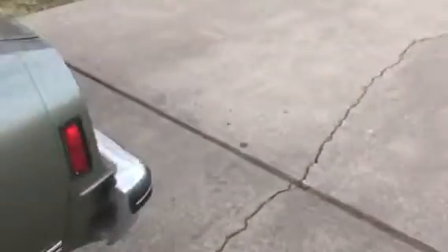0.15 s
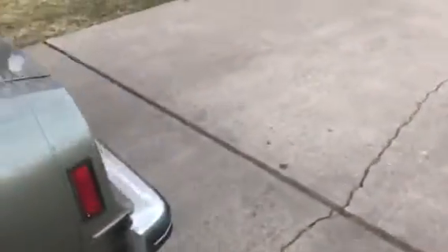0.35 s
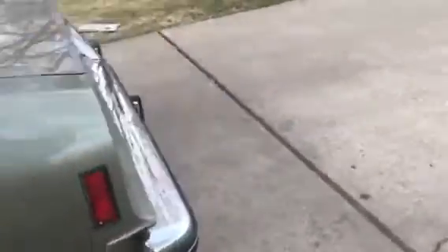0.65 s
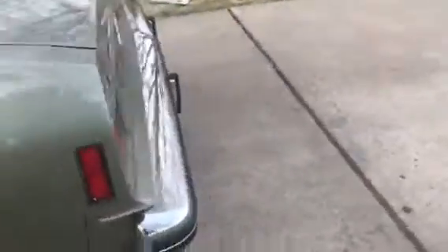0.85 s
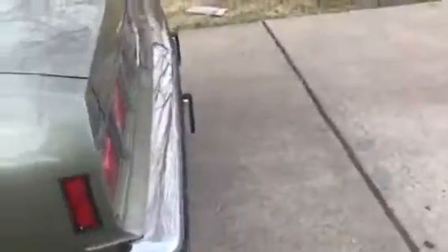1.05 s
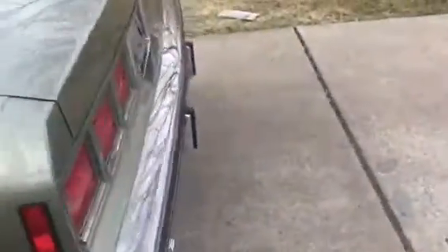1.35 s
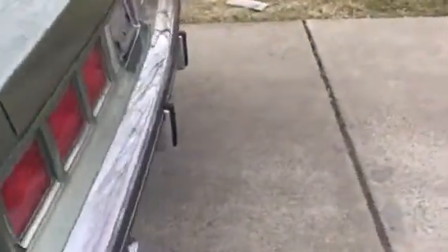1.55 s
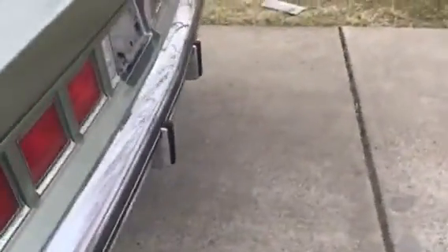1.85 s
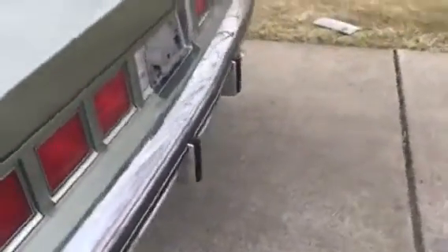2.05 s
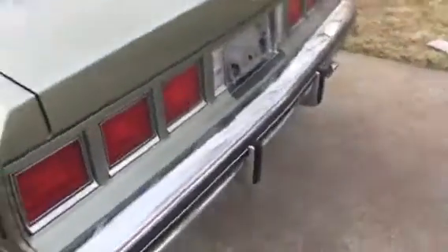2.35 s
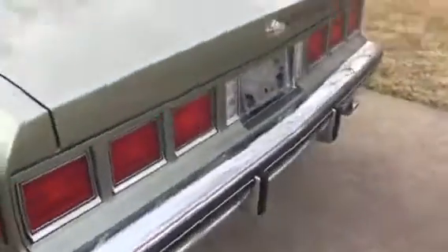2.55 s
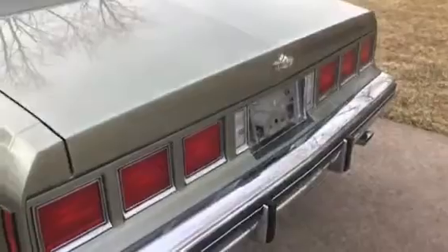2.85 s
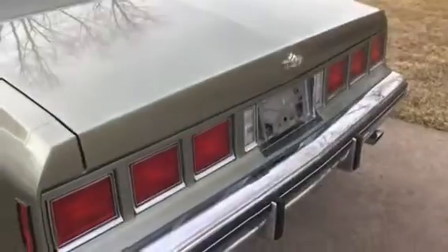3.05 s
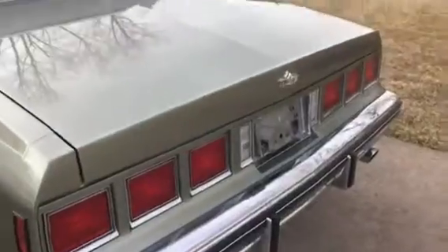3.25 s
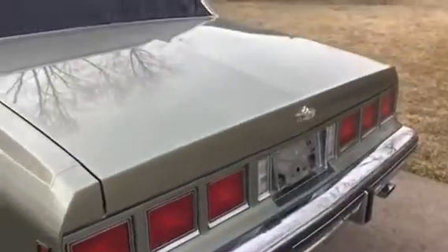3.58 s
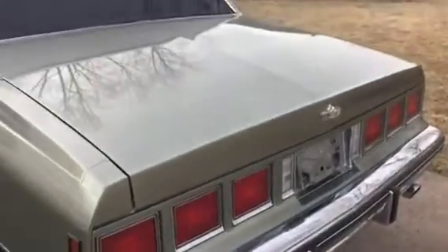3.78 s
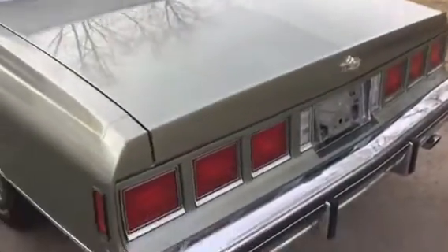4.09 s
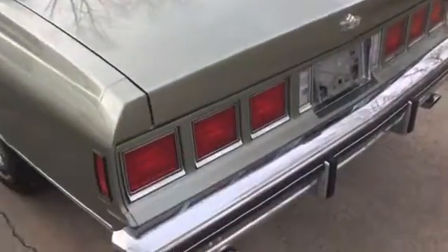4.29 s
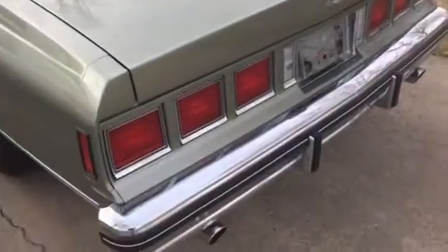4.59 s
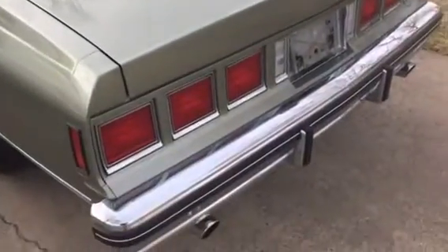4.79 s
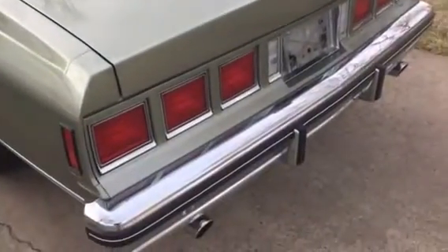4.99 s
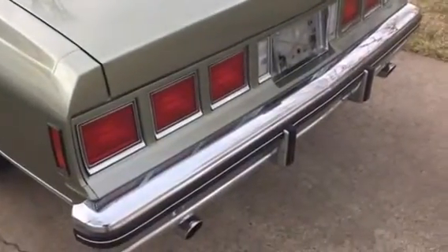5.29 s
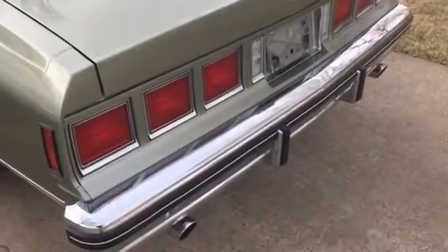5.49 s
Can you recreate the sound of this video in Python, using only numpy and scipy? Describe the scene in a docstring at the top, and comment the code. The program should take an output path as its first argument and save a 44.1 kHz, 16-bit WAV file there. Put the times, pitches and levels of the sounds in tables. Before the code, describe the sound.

A big eight-cylinder petrol car idles outdoors, heard close by on a handheld mono microphone moving from its side to its rear. From 0 to about 2 s the idle is fairly fast, around 53 firings a second: a loud deep boom with a fuller burble, a hollow silencer hum and soft raspy chuffs. The bass swells as the near pipe is passed around 1.8 s. A short gritty hand scuff comes at 1.9 s. Between 1.9 and 2.4 s the revs sink to about 45 firings a second, and a low drone swells as they settle. A second, crackly brush falls at 2.6-2.7 s, with a very faint thin whine at 2.7-3.3 s. Until 5.6 s the slow idle continues evenly, darker and loping, with quiet pipe puffs, fine hiss, thin metallic ringing and faint high squeaky ticks, some chirping out. It does not rev or stop.

```python
"""Idling V8 with twin exhaust pipes

A big petrol V8 on a driveway drops from a fast idle to a slow one after two seconds.
One train of eight uneven pulses a cycle excites pipe, silencer and tailpipe resonances: boom, burble and rasp.
Shaped noise hisses at the pipe mouths; metal rings, squeaks and whines faintly in decaying tones.
A hand brushes the microphone twice, as gritty noise, while it is carried round the bumper."""
import sys
import numpy as np
from scipy import signal
from scipy.fft import rfft, irfft
from scipy.io import wavfile
from scipy.ndimage import uniform_filter1d

SR = 44100
rng = np.random.default_rng(int(sys.argv[2]) if len(sys.argv) > 2 else 0)


def wav_record(signal):
    """Record a signal, one row per channel, as 16-bit PCM in the file named by sys.argv[1]."""
    frames = np.transpose(np.atleast_2d(signal))
    bounded = np.clip(frames, -1, 1)
    # unit amplitude maps onto the largest positive 16-bit level
    quanta = np.round(bounded * 32767).astype(np.int16)
    wavfile.write(sys.argv[1], SR, quanta)


N = 248283
TIME = np.arange(N) / SR
BAND_LIMIT_HZ = 15800
WALK_S = 0.63, 3.15  # the microphone passes from beside the car to behind it between these times


def gain_of(db):
    """Decibel law: amplitude grows tenfold every 20 dB."""
    return 10 ** (np.asarray(db) / 20)


def evened(x):
    """Power normalisation: scales to an rms of one."""
    return x / np.sqrt(np.mean(x ** 2) + 1e-20)


def read_table(table, s):
    """Linear interpolation of a two-column timed table at the times s."""
    return np.interp(s, *np.transpose(table))


def at_level(x, db):
    """Slow gain control: the smoothed power follows db while the beat of the cylinders remains."""
    size = SR // 3
    power = uniform_filter1d(uniform_filter1d(x ** 2, size), size // 2)
    return gain_of(db) * x / np.sqrt(abs(power) + 1e-20)


def add(mix, s, sound):
    """Superposition: adds a sound into mix from time s."""
    start = round(s * SR)
    sound = sound[max(-start, 0):]
    part = mix[max(start, 0):][:len(sound)]
    part += sound[:len(part)]


def band(x, low_hz, high_hz, order=2):
    """Band-pass filtering: keeps the energy between two frequencies."""
    edges = [low_hz, min(high_hz, SR / 2 - 100)]
    return signal.sosfilt(signal.butter(order, edges, "band", fs=SR, output="sos"), x)


def coloured(x, spectrum):
    """Spectral shaping: weights each frequency by a table of frequency_hz, gain_db."""
    hz, db = np.transpose(spectrum)
    bins_hz = np.fft.rfftfreq(N, 1 / SR)
    gain_db = np.interp(np.log(bins_hz + 1), np.log(hz), db)
    return irfft(rfft(x) * gain_of(gain_db), N)


def noise(spectrum):
    """Coloured noise: random pressure with a fixed spectrum and an rms of one."""
    return evened(coloured(rng.standard_normal(N), spectrum))


def ring(x, modes):
    """Modal superposition: resonances side by side, neighbours in opposite phase at the mouth."""
    out = np.zeros(N)
    for k, (hz, width_hz, db) in enumerate(modes):
        resonator = signal.iirpeak(hz, hz / width_hz, fs=SR)
        out += (-1) ** k * gain_of(db) * signal.lfilter(*resonator, x)
    return out


def ring_in_passing(x, modes):
    """Directivity: modes reach the side of the car and its rear with different strengths."""
    modes = np.array(modes)
    behind = np.interp(TIME, WALK_S, [0, 1])
    beside_sound = ring(x, modes[:, :3])
    behind_sound = ring(x, np.delete(modes, 2, axis=1))
    return (1 - behind) * beside_sound + behind * behind_sound


def puffs(times, db, decay):
    """Impulse train: puffs of gas that swell to a peak after the decay time and die away."""
    out, u = np.zeros(N), np.arange(SR // 8) / SR / decay
    for s, size in zip(times, gain_of(db)):
        add(out, s, size * u * np.exp(1 - u))
    return out


# The idle sinks, undershoots and settles: start_s [s], firing_rate_hz [firings per second]
IDLE_SPEED = [(0, 53.56), (0.7, 53.52), (1.3, 52.12), (1.85, 52.02), (2.4, 45.6), (2.95, 43.82),
              (3.4, 45.42), (3.9, 44.44), (4.35, 44.96), (5.63, 44.46)]


def firing_rate(s):
    """Firing frequency: cylinder firings per second at the times s."""
    return read_table(IDLE_SPEED, s)


def fastness(s):
    """Operating point: one at fast idle, zero at slow idle."""
    return np.interp(firing_rate(s), [45, 53], [0, 1])


def exhaust_level(fast_db, slow_db, near_db):
    """Proximity effect: level follows idle speed and changes as the microphone passes the near pipe."""
    near = np.exp(-((TIME - 1.84) / 0.55) ** 2)  # passing time and its spread, s
    return slow_db + (fast_db - slow_db) * fastness(TIME) + near_db * near


# One row a cylinder: place_in_cycle [firing intervals], then fast_idle_db and slow_idle_db [dB] for each of
# push, sharp edge, blow on the silencer, gas in the lower tailpipe, gas in the higher tailpipe;
# last squeak_db [dB]
CYLINDERS = [(.95, 5.5, -5, 6, 0.5, -6, -14, -10, -8.5, -7, -6, -7),
             (1.96, 0, -8.5, -14, -7.5, -18.5, -1, -5, -9.5, -2.5, 3, -6),
             (3.09, 1, 0, 2.5, -5, 1.5, 2.5, -5, -7, -11.5, -4, -3.5),
             (3.97, -5.5, -9, -1.5, -4, -10.5, 2, -15, -17, -4.5, -6.5, -1),
             (5.06, 0.5, -3, -1.5, -8.5, -1, -7.5, -6, -5.5, -5.5, -11, -2.5),
             (6.06, 4.7, -1.7, 1, -20.5, -1, -8, -4, -10, -4.5, -10, -4.5),
             (6.92, 5.5, -6, -12, -14.5, -5.5, -1.5, -6.5, -8, -2, 2.5, -4.5),
             (8.15, -5.5, -1.8, -3.5, -12, -8.5, -9.5, -2.5, -3, -6, -1.5, -13)]


def firings(jitter_s=0.000094, cycle_start_s=-.0107):
    """Uneven firing: pulse times and each pulse's cylinder row; the two banks fire slightly out of step."""
    turns = np.cumsum(firing_rate(TIME)) / SR
    count = len(CYLINDERS)
    cycle, cylinder = np.divmod(np.arange(-1, int(turns[-1])), count)
    rows = np.array(CYLINDERS)[cylinder].T
    times = np.interp(cycle * count + rows[0], turns, TIME) + cycle_start_s
    return times + jitter_s * rng.standard_normal(len(times)), rows


def throbbing(times, low_gas_db, scatter_db=2.0):
    """Flow modulation: a gentle envelope that swells at every firing."""
    scatter = scatter_db * np.minimum(rng.standard_normal(len(times)), 1)
    return puffs(times, 0.098 * low_gas_db + scatter, decay=0.0061)


# Colour of the gas rush: frequency_hz [Hz], gain_db [dB]
RUSH_SPECTRUM = [(20, -10.5), (150, 18.5), (450, 10), (900, 5), (1500, -1.5), (2600, -3.5), (3100, -6.5),
                 (3900, -6), (4900, -20), (6000, -43)]


def rush(throb, level_db=-48):
    """Turbulent flow noise: broad noise modulated lightly by the firings."""
    return gain_of(level_db) * evened(noise(RUSH_SPECTRUM) * (1 + 0.22 * throb))


# Colour of the fine hiss: frequency_hz [Hz], gain_db [dB]
HISS_SPECTRUM = [(3500, -29.5), (4400, -1.5), (4950, -6), (5600, -1), (6800, -1), (7700, -7.5),
                 (8600, -4.5), (9700, -6.5), (10400, -12.5), (11500, -7.5), (15500, -13)]
# Level of the fine hiss: start_s [s], level_db [dB]
HISS_LEVEL = [(0, -66.5), (.62, -66.5), (.95, -61), (2.05, -64.5), (2.4, -62), (5.6, -61)]


def hiss(throb):
    """Turbulent flow noise: treble modulated by the firings, with a slowly changing level."""
    return gain_of(read_table(HISS_LEVEL, TIME)) * evened(noise(HISS_SPECTRUM) * (1 + 0.32 * throb))


# Colour of the low rumble: frequency_hz [Hz], gain_db [dB]
RUMBLE_SPECTRUM = [(15, -29.5), (28, -13), (40, 6), (110, -6), (200, -14), (400, -44.5)]


def rumble():
    """Low-frequency noise: an unsteady bed under the exhaust pulses."""
    return gain_of(exhaust_level(fast_db=-50, slow_db=-49, near_db=-3.5)) * noise(RUMBLE_SPECTRUM)


# Whines: start_s [s], length_s [s], level_db [dB], pitch_hz [Hz], width_hz [Hz],
# purity [amplitude of the clean tone over its fuzz]
WHINES = [(.08, .52, -77, 13900, 600, 0), (2.7, .46, -62, 1394, 22, 3), (2.75, .55, -70, 2261, 40, 1),
          (3.56, .08, -60, 1240, 40, 2), (3.73, .2, -71, 5400, 140, 0)]


def whines():
    """Narrow-band tones: thin mechanical sounds and whistles that come and go."""
    out = np.zeros(N)
    for s, length, db, hz, width_hz, purity in WHINES:
        fuzz = band(rng.standard_normal(2 * SR), hz - width_hz / 2, hz + width_hz / 2)
        tone = evened(fuzz[-int(length * SR):])
        tone += purity * np.sin(2 * np.pi * hz * TIME[:len(tone)])
        add(out, s, gain_of(db) * evened(tone) * signal.windows.tukey(len(tone), .5))
    return out


# Brushes of the hand: start_s [s], length_s [s], level_db [dB before colouring], lowest_hz [Hz], highest_hz [Hz]
BRUSHES = [(1.899, 0.05, -52, 1500, 10800), (1.935, 0.042, -59.5, 1480, 6900),
           (2.594, 0.055, -54, 1400, 8000), (2.668, 0.043, -55.5, 1800, 8000)]


def brushes(grain_db=4.0, slip_db=2):
    """Stick-slip friction: skin scrapes over the microphone housing as gritty noise."""
    out, count = np.zeros(N), SR // 10
    for s, length, db, low_hz, high_hz in BRUSHES:
        size = int(length * SR)
        grains = np.minimum(rng.exponential(1, count), 3)
        grit = rng.standard_normal(count) * gain_of(grain_db * grains)
        slips = np.minimum(evened(uniform_filter1d(rng.standard_normal(count), size=80)), 2)
        scrape = band(grit * gain_of(slip_db * slips), low_hz, BAND_LIMIT_HZ, order=3)
        scrape = band(scrape, low_hz / 2, high_hz, order=1)[-size:]
        add(out, s, gain_of(db) * evened(scrape) * signal.windows.tukey(size, .5))
    return out


# Snags within the brushes: start_s [s], level_db [dB before decay and colouring], highest_hz [Hz]
SNAGS = [(1.9095, -45, 9000), (1.915, -43, 10000), (1.918, -43, 9000), (1.935, -43, 9000),
         (2.5875, -42, 7000), (2.5985, -41, 7000), (2.604, -39, 8000), (2.609, -35.5, 7000),
         (2.614, -40, 8000), (2.618, -39, 8000), (2.624, -34.5, 6000), (2.627, -38.5, 4000),
         (2.6835, -33.5, 2600), (2.717, -48, 5000)]


def snags(decay_s=0.0008, low_hz=1650):
    """Stick-slip release: the skin catches on the housing and lets go with a dry tick."""
    out, t = np.zeros(N), TIME[:SR // 50]
    for s, db, high_hz in SNAGS:
        grit = band(rng.standard_normal(len(t)), low_hz, BAND_LIMIT_HZ, order=3)
        grit = evened(band(grit, low_hz / 2, high_hz, order=1))
        add(out, s, gain_of(db) * grit * np.exp(-t / decay_s))
    return out


# Colour of the hand noise: frequency_hz [Hz], gain_db [dB]
PORT_RESPONSE = [(1000, 3), (3800, 3), (4950, -5), (6400, 3), (7700, -10), (9000, 1), (10400, -4.5),
                 (12000, -2), (15000, 2)]


def handling():
    """Transfer function: brushes and snags share one uneven treble response."""
    return coloured(brushes() + snags(), PORT_RESPONSE)


def chirp(hz, width_hz, decay):
    """Frequency modulation: a short squeak with a trembling pitch and an envelope peak of one."""
    u = TIME[:SR // 8] / decay
    tremble = evened(uniform_filter1d(rng.standard_normal(len(u)), size=50))
    return u * np.exp(1 - u) * np.sin(2 * np.pi * np.cumsum(hz + width_hz * tremble) / SR)


# Louder squeaks: start_s [s], level_db [dB, 1 below the played peak], pitch_hz [Hz], decay_s [s]
SQUEAKS = [(1.75, -58.5, 3380, 0.016), (2.18, -58, 3560, 0.0083), (2.355, -56, 3660, 0.0088),
           (2.425, -58, 3660, .008), (2.775, -56, 3680, 0.009), (2.889, -70, 3400, 0.016),
           (3.09, -59, 3450, .011), (3.13, -63, 3290, 0.012), (3.225, -58, 3640, 0.0082),
           (3.275, -60, 3380, 0.0097), (3.49, -53, 3630, 0.0074), (4.12, -55, 3380, 0.0065),
           (4.453, -55.5, 3350, 0.0055), (4.52, -54, 3370, .008), (5.097, -52, 3750, 0.0052),
           (5.233, -59, 3690, 0.0076)]


def squeaks(times, squeak_db, scatter_db=3.5, lead_s=0.0033):
    """Friction: each firing rubs loose metal into a faint two-pitch tick; now and then it chirps out."""
    ticking, loud = np.zeros(N), np.zeros(N)
    draws = rng.standard_normal((len(times), 3))
    for s, db, (harder, higher, upper) in zip(times, squeak_db, draws):
        tick = chirp(3340 + 20 * higher, width_hz=60, decay=0.0045)  # the lower pitch wanders, Hz
        upper_db = -6.5 + 3 * min(upper, 1)
        tick += gain_of(upper_db) * chirp(3660, width_hz=110, decay=0.004)
        add(ticking, s - lead_s, gain_of(db + scatter_db * min(harder, 1)) * tick)
    for s, db, hz, decay in SQUEAKS:
        add(loud, s, gain_of(db + 1.0) * chirp(hz, width_hz=150, decay=decay))
    tick_level_db = np.interp(TIME, WALK_S, [-76, -65.5])  # beside the car, behind it
    return gain_of(tick_level_db) * evened(ticking) + loud


# Thin ringing of the metal: frequency_hz [Hz], width_hz [Hz], beside_db [dB], behind_db [dB]
METAL_MODES = [(868, 25, -6, -7.5), (1006, 12, 8, 1.5), (1072.5, 18, 9, 0.5), (1115, 43, -4.5, -3.5),
               (1159, 22, 3, -6), (1232, 11, -13.5, -3), (1400, 35, -19, -7), (1463, 43, -15, -10),
               (1656, 55, -8, -13.5), (1978, 19, -12, -10), (2232, 29, -21, -7.5), (2284, 24, -21, -9),
               (2370, 36, -7.5, -11.5), (2910, 23, -21, -14)]
# Harder shakes that set the metal ringing: start_s [s], strength_db [dB]
JOLTS = [(2.968, -9), (3.32, -7), (3.585, -2), (3.67, -7), (4.748, 0), (4.93, -7), (5.468, -7)]


def metal(throb):
    """Forced vibration: steady, throbbing and jolting noise excites the modes of thin metal."""
    jolts = puffs(*np.transpose(JOLTS), decay=0.0071)
    shaking = (0.054 + throb + jolts) * rng.standard_normal(N)
    level_db = np.interp(TIME, WALK_S, [-64, -55.5])  # beside the car, behind it
    return at_level(ring_in_passing(shaking, METAL_MODES), level_db)


# Harder chuffs of gas: start_s [s], level_db [dB], pitch_hz [Hz], rise_s [s]
CHUFFS = [(0, -39.5, 678, .008), (.135, -40.5, 684, .01), (.266, -38.5, 680, .012), (.415, -43, 545, .002),
          (.428, -39, 680, .01), (.578, -42, 690, .008), (.728, -43, 680, .012), (.868, -37.5, 676, .012),
          (.908, -41, 548, .002), (1.022, -38.5, 677, .012), (1.318, -41, 676, .012),
          (1.147, -40, 534, .002), (1.453, -40, 582, .002), (1.485, -39.5, 675, .01),
          (1.607, -42, 540, .002), (1.765, -38, 540, .0014), (1.783, -35, 530, .002),
          (2.243, -37, 556, .0014), (2.594, -35.5, 547, .0014), (2.615, -42, 674, .01),
          (2.775, -39, 560, .003), (2.797, -41, 671, .01), (2.956, -39, 537, .002), (3.14, -43, 545, .003),
          (3.16, -45, 675, .01), (3.31, -42, 550, .002), (3.512, -44, 680, .008), (3.688, -42, 550, .002),
          (3.87, -45, 675, .01), (4.208, -36.5, 553, .002), (4.385, -43, 550, .004),
          (4.562, -40, 545, .002), (4.741, -36.5, 556, .0014), (4.923, -40, 563, .002),
          (4.944, -43, 672, .008), (5.096, -41, 552, .0014), (5.12, -44, 677, .008), (5.3, -45, 675, .01),
          (5.459, -38, 552, .0014)]


def chuffs(decay_s=0.015, rough=0.3):
    """Transient resonance: a harder burst of gas strikes one of the tailpipes, which rings briefly."""
    out, t = np.zeros(N), TIME[:SR // 8]
    for s, db, hz, rise in CHUFFS:
        tone = np.sqrt(2) * np.sin(2 * np.pi * hz * t)
        tone += rough * evened(band(rng.standard_normal(len(t)), 450, 750))
        swell = (1 - np.exp(-t / rise)) * np.exp(-t / (decay_s + rise))  # a slow swell also holds longer
        add(out, s, gain_of(db) * swell / swell.max() * tone)
    return out


def rasp(times, gas_db, modes, steady=0.018, smoothing_s=0.018, lead_s=0.00296, knock_share=0.45, damping=1.9):
    """Flow-excited resonance: puffs knock a tailpipe and blow through it; uneven cylinders make the lope."""
    db = gas_db + 0.9 * rng.standard_normal(len(times))
    # the pitch wanders among the modes, but the strength is set by the flow
    tone = band(ring_in_passing(rng.standard_normal(N), modes), 463, 850)
    power = abs(uniform_filter1d(tone ** 2, int(smoothing_s * SR)))
    tone /= np.sqrt(power + .15 * np.mean(tone ** 2))
    blow = (steady + puffs(times - lead_s, db, decay=.0085)) * tone
    damped = np.array(modes) * [1, damping, 1, 1]  # wider modes for the knock
    knock = band(ring_in_passing(puffs(times - lead_s, db, decay=0.00016), damped), 450, 850)
    return band(evened(blow) + knock_share * evened(knock), 400, 884, order=3)


# Resonances of the higher tailpipe: frequency_hz [Hz], width_hz [Hz], beside_db [dB], behind_db [dB]
HIGH_TAIL_MODES = [(672.7, 8.2, -0.5, 7.5), (737, 26, -24.5, -9.5), (767.4, 8.9, -3, -6)]


def high_rasp(times, gas_db):
    """Pipe resonance: the rasp of the higher-pitched tailpipe."""
    return at_level(rasp(times, gas_db, HIGH_TAIL_MODES), exhaust_level(fast_db=-47.5, slow_db=-52, near_db=-1))


# Resonances of the lower tailpipe: frequency_hz [Hz], width_hz [Hz], beside_db [dB], behind_db [dB]
LOW_TAIL_MODES = [(506.7, 7.6, -6, 0.5), (525.6, 21, -7, 1), (570.8, 18, -8.5, 1), (614.6, 10, -4, -6)]


def low_rasp(times, gas_db):
    """Pipe resonance: the rasp of the lower-pitched tailpipe."""
    return at_level(rasp(times, gas_db, LOW_TAIL_MODES), exhaust_level(fast_db=-51.5, slow_db=-50.5, near_db=4.5))


# Resonances of the silencer: frequency_hz [Hz], width_hz [Hz], beside_db [dB], behind_db [dB]
SILENCER_MODES = [(311, 17.4, -2.5, -8.5), (335.4, 6.3, 0.5, 2.5), (399, 5.3, -29, -12),
                  (413, 6.6, -14, -13.5)]


def silencer(times, shell_db, lead_s=0.00617, swirl_share=.55):
    """Shell resonance: pulses strike the silencer, which hums in a limping rhythm of its own."""
    fronts = evened(band(puffs(times - lead_s, shell_db, decay=0.00037), 230, 480))
    turbulence = puffs(times - lead_s, shell_db, decay=0.0068) * rng.standard_normal(N)
    swirl = evened(band(turbulence, 250, 480))
    hum = band(ring_in_passing(fronts + swirl_share * swirl, SILENCER_MODES), 292, 460, order=3)
    return at_level(hum, exhaust_level(fast_db=-42.5, slow_db=-51, near_db=1))


def drone(mode_hz=147, width_hz=9, level_db=-28.5):
    """Resonance crossing: as the idle sinks, the third firing harmonic slides through a mode and swells."""
    hz = 3 * firing_rate(TIME)
    response = 1 / (1 + (2 * (hz - mode_hz) / width_hz) ** 2)
    return gain_of(level_db) * response * np.sqrt(2) * np.sin(2 * np.pi * np.cumsum(hz) / SR)


# Higher standing waves in the pipes: frequency_hz [Hz], width_hz [Hz], beside_db [dB], behind_db [dB]
PIPE_MODES = [(140.2, 6.9, 12, 8.5), (158.4, 17, 1, -3.5), (173.2, 11, 3, 3), (189.2, 38.2, -1, -8),
              (251.3, 10, -2, -21.5), (257.1, 5.1, -14, -3.5)]


def burble(times, edge_db, lead_s=0.01101, front_s=0.00039, swirl_share=.26):
    """Standing waves: sharp fronts run ahead of the slugs and, with turbulence, ring the higher modes."""
    db = edge_db + rng.standard_normal(len(times))  # 1 dB scatter
    fronts = evened(band(puffs(times - lead_s, db, decay=front_s), 120, 610))
    turbulence = puffs(times - lead_s, db, decay=0.016) * rng.standard_normal(N)
    swirl = evened(band(turbulence, 150, 350))
    note = band(ring_in_passing(fronts + swirl_share * swirl, PIPE_MODES), 156.4, 430, order=3)
    return at_level(note, exhaust_level(fast_db=-30.5, slow_db=-39, near_db=-0.5))


# Deep modes of pipes and silencers: frequency_hz [Hz], width_hz [Hz], gain_db [dB]
BOOM_MODES = [(53.4, 23.7, -1.4), (68.1, 56.1, 3.5), (83.5, 38.6, 7.5), (101.17, 8.95, 10)]


def deep_note(times, push_db, scatter_db=1.66):
    """Modal excitation: slugs of gas drive the deep modes; at slow idle each leaves more gently."""
    corner_hz = np.exp(np.interp(firing_rate(times), [45, 52], np.log([23, 400])))
    slug_db = push_db + scatter_db * rng.standard_normal(len(times))
    size = gain_of(slug_db) * np.hypot(corner_hz, 90)
    flow, t = np.zeros(N), TIME[:SR // 10]
    for s, hz, a in zip(times, corner_hz, size):
        add(flow, s, a * np.exp(-2 * np.pi * hz * t))
    # the lowest notes, below about 40 Hz, come through only weakly
    radiated = signal.sosfilt(signal.butter(3, 40, "high", fs=SR, output="sos"), flow)
    deep_band = signal.butter(3, [33, 190], "band", fs=SR, output="sos")
    return signal.sosfiltfilt(deep_band, ring(radiated, BOOM_MODES))


def firing_note(x):
    """Synchronous detection: the tone in x at the firing rate, averaged over a few engine cycles."""
    turn = np.exp(2j * np.pi * np.cumsum(firing_rate(TIME)) / SR)
    return 2 * (turn * uniform_filter1d(x / turn, size=SR // 2)).real


def thrum_and_boom(times, push_db, uneven_share=0.08):
    """Diffraction: the firing note bends round the car and varies less from place to place than the boom."""
    deep = deep_note(times, push_db)
    low = signal.sosfiltfilt(signal.butter(6, 60, fs=SR, output="sos"), deep)
    thrum = (1 - uneven_share) * firing_note(low) + uneven_share * low
    thrum = at_level(thrum, exhaust_level(fast_db=-26, slow_db=-25, near_db=-1))
    return thrum + at_level(deep - low, exhaust_level(fast_db=-19.5, slow_db=-17.5, near_db=3.5))


def scene():
    """Common excitation: one train of firings drives every part of the exhaust."""
    times, rows = firings()
    fast_db, slow_db, squeak_db = rows[1:-1:2], rows[2:-1:2], rows[-1]
    part_db = slow_db + (fast_db - slow_db) * fastness(times)
    push_db, edge_db, shell_db, low_gas_db, high_gas_db = part_db
    throb = throbbing(times, low_gas_db)
    mix = rush(throb) + hiss(throb) + rumble()
    mix += whines() + handling() + squeaks(times, squeak_db) + metal(throb)
    mix += chuffs() + high_rasp(times, high_gas_db) + low_rasp(times, low_gas_db)
    mix += silencer(times, shell_db) + drone() + burble(times, edge_db)
    mix += thrum_and_boom(times, push_db)
    return mix[None]


def record(dry):
    """Band limitation: a linear-phase low-pass filter removes the highest treble."""
    low_pass = signal.firwin(511, BAND_LIMIT_HZ, window=("kaiser", 9), fs=SR)
    return signal.oaconvolve(dry, low_pass[None], "same")


dry = scene()
out = record(dry)
wav_record(out)
```